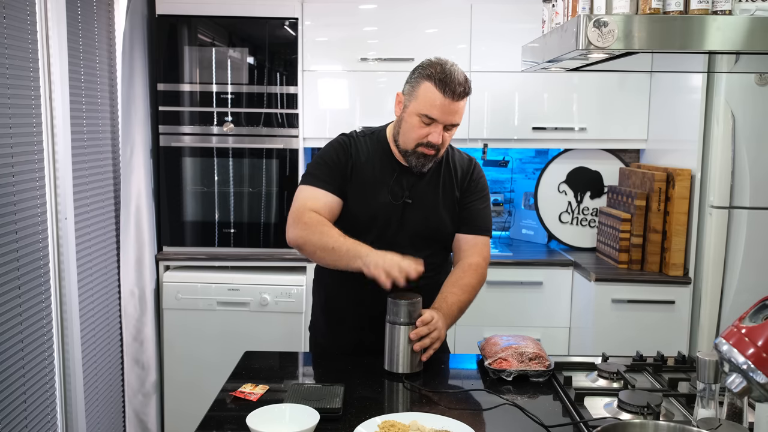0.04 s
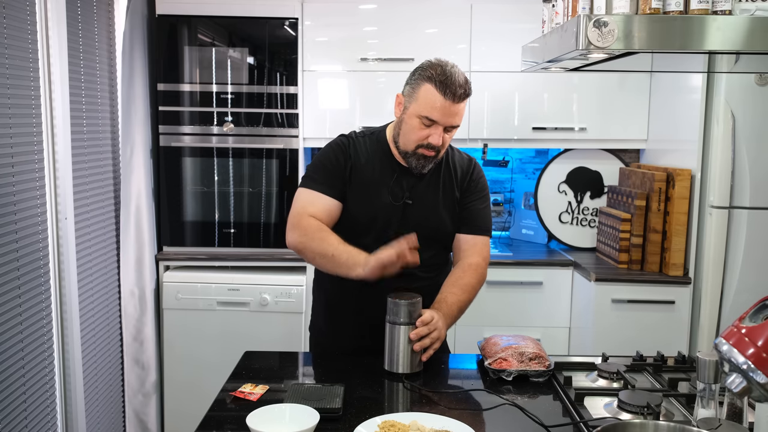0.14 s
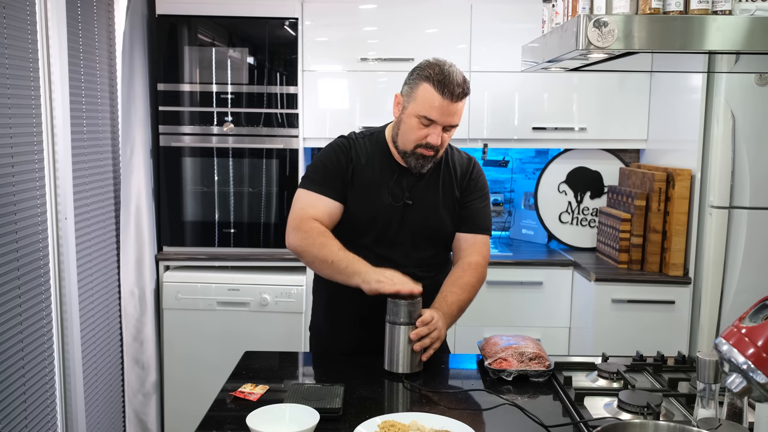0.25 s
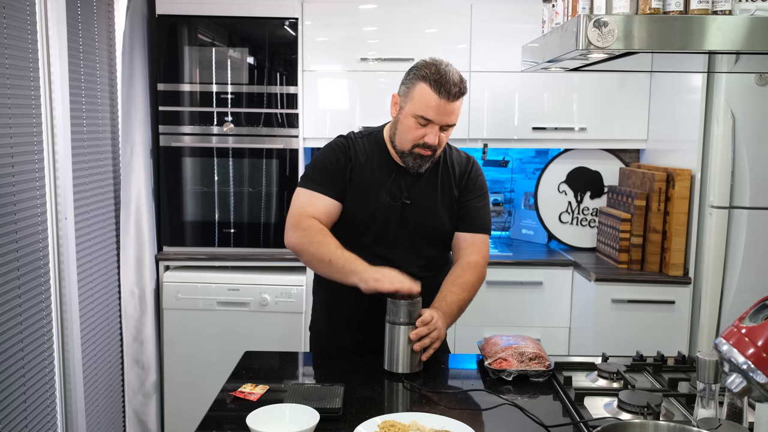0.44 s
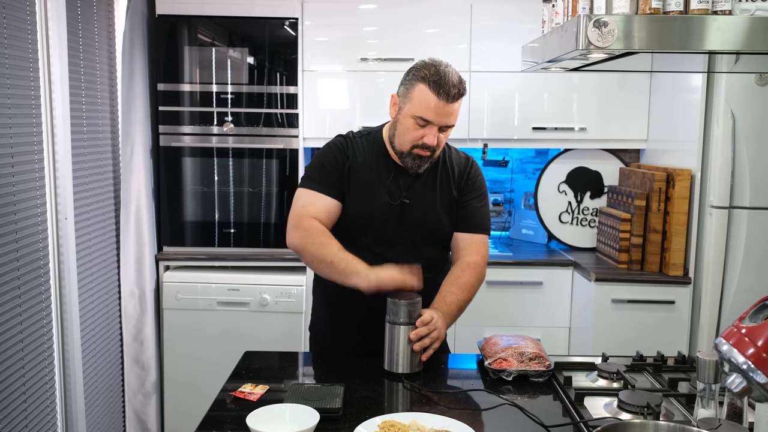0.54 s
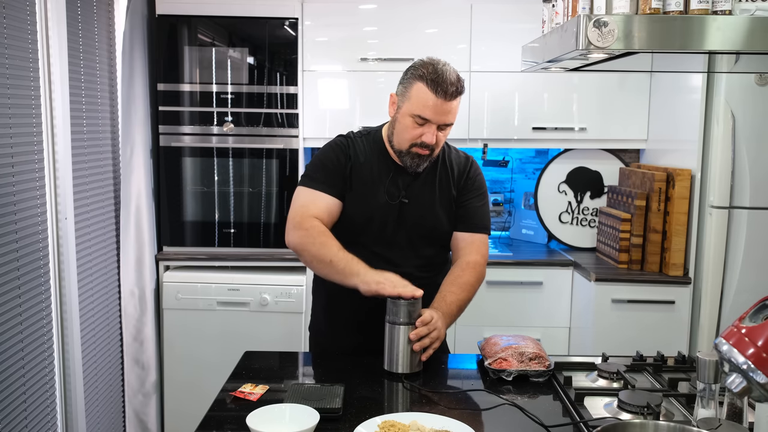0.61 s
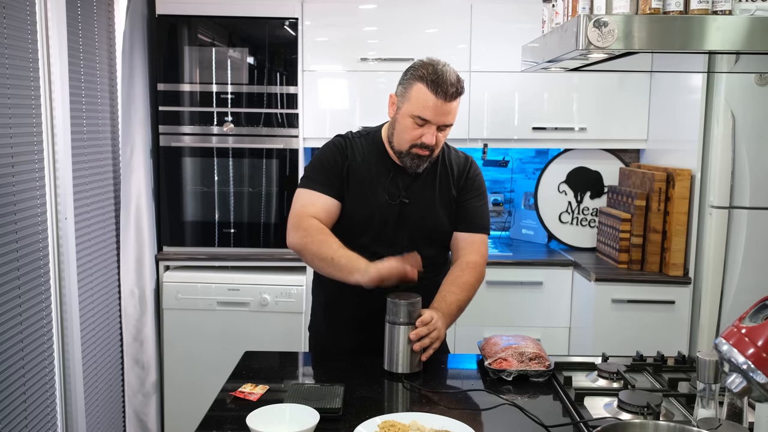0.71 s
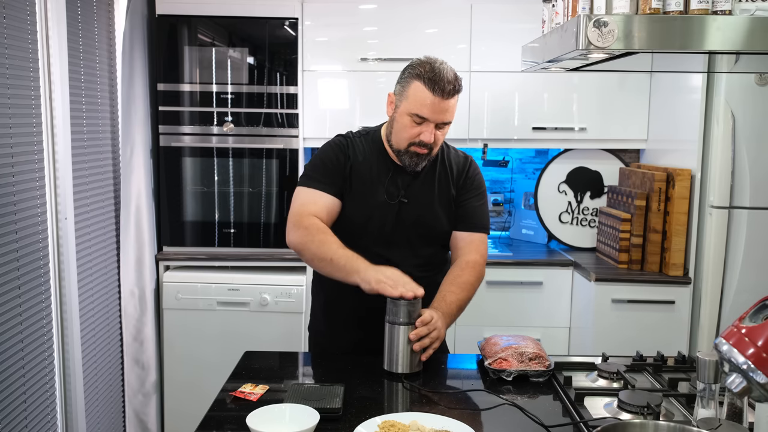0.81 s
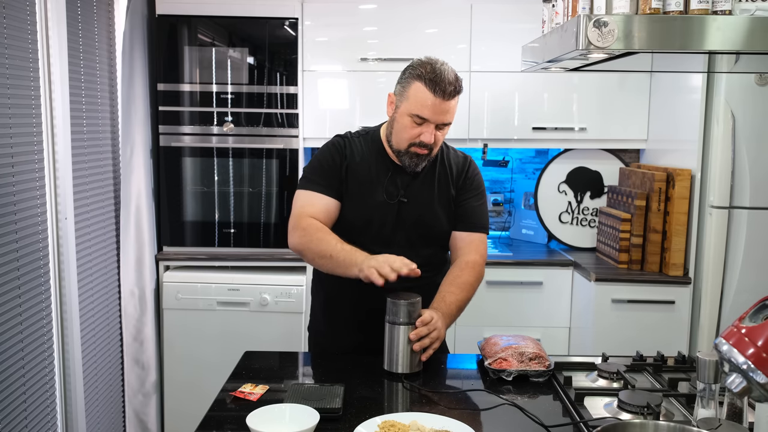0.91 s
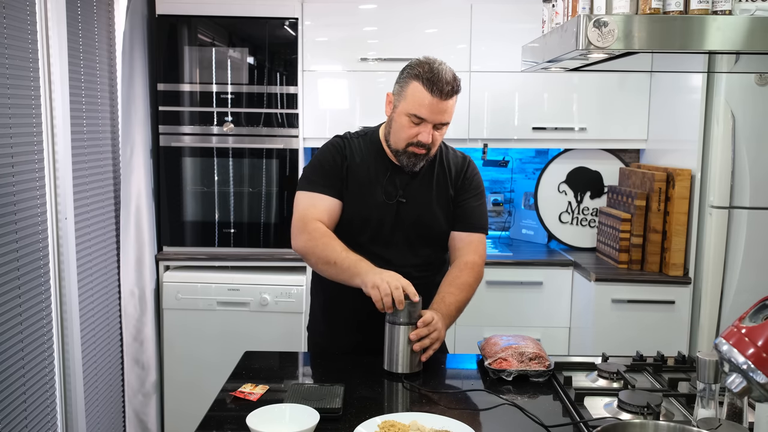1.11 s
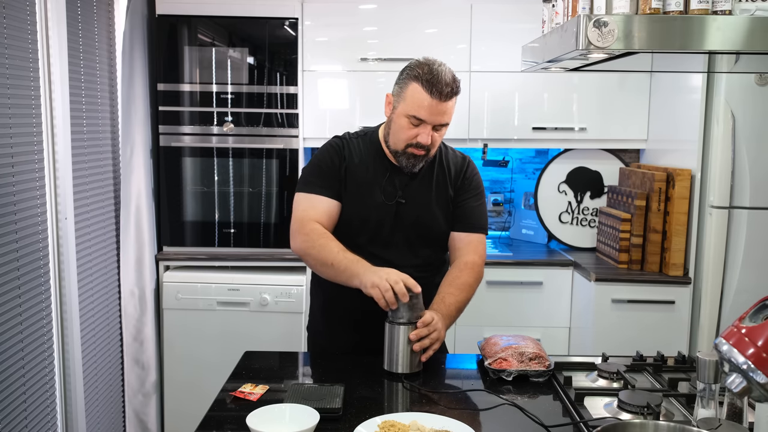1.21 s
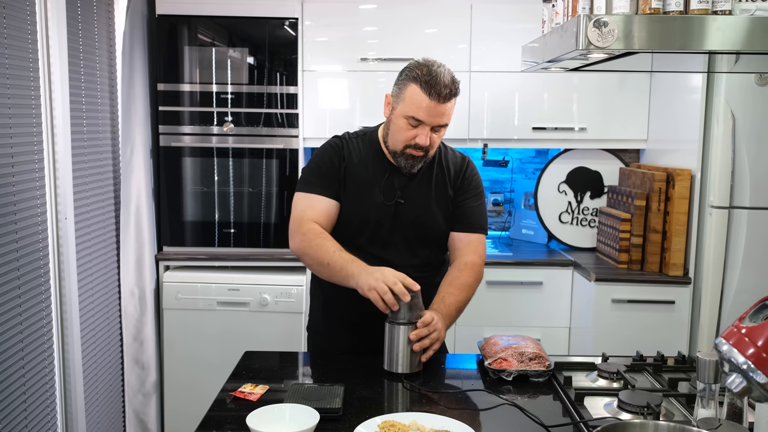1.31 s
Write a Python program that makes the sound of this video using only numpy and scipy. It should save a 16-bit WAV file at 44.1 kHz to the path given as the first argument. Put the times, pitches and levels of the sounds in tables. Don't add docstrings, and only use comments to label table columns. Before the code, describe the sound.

A hand smacks a grinder's plastic lid four times, then twists it with knocks and scrapes

```python
import sys
import numpy as np
from scipy import signal
from scipy.fft import rfft, irfft
from scipy.io import wavfile
from scipy.ndimage import uniform_filter1d

SR = 44100
rng = np.random.default_rng(int(sys.argv[2]) if len(sys.argv) > 2 else 0)


def volts(x):
    e = np.asarray(x, float) / 20
    return 10 ** e


def master(y):
    cut = np.clip(np.atleast_2d(y).T, -1, 1)
    pcm = np.round(cut * 32767)
    wavfile.write(sys.argv[1], SR, pcm.astype(np.int16))


N = 59535


def ring(force, hz, t60):
    pole = np.exp(2j * np.pi * hz / SR - np.log(1000) / (t60 * SR))
    return signal.lfilter([1], [1, -pole], force).imag


def band(x, hz, width):
    b, a = signal.iirpeak(min(hz, .45 * SR), hz / width, SR)
    return signal.lfilter(b, a, x)


def push(start_s, length_s):
    phase = (np.arange(N) / SR - start_s) / length_s
    return np.sin(np.pi * np.clip(phase, 0, 1)) * np.pi / (2 * length_s * SR)


def fade(start_s, t60):
    t = np.arange(N) / SR - start_s
    return (t >= 0) * volts(-60 * np.maximum(t, 0) / t60)


# (frequency [Hz], level per hertz [dB])
AIR_SPECTRUM = [(25, 7), (58, -2), (140, -5), (500, -7.5), (950, -8), (1500, -21), (11500, -34.5),
                (14500, -48.5)]


def air():
    level_db, waver_db, waver_samples = -64.5, 0.85, 1500
    hz, db = np.array(AIR_SPECTRUM).T
    f = np.maximum(np.arange(N // 2 + 1) * SR / N, 1)
    shape = volts(np.interp(np.log(f), np.log(hz), db))
    hiss = irfft(rfft(rng.standard_normal(N)) * shape, N)
    steps = np.repeat(rng.standard_normal(N // waver_samples + 1), waver_samples)[:N]
    waver = uniform_filter1d(steps, size=waver_samples)
    return hiss / hiss.std() * volts(level_db + waver_db * waver)


def patter(pop_s, low_hz, high_hz):
    lead_s, t60, grows_db, scatter_db = .0024, 0.0034, 2, 2.5
    taps = np.zeros(N)
    for finger, (strength, timing) in enumerate(rng.standard_normal((4, 2))):
        tap_s = pop_s - lead_s * (1 - (finger + 0.264 * timing) / 3.5)
        taps += volts(scatter_db * strength + grows_db * (finger - 4)) * push(tap_s, .00008)
    low = ring(taps, low_hz, 2.37 * t60)
    middle = volts(-2.5) * ring(taps, (low_hz * high_hz) ** .5, t60)
    high = volts(-1) * ring(taps, high_hz, 1.74 * t60)
    hiss = rng.standard_normal(N) * fade(pop_s - .0007, 0.0079)
    return low + middle + high + volts(-1) * band(hiss, 8900, 4200)


# (frequency [Hz], level [dB], T60 [s])
BODY_MODES = [(425, -1.5, 0.051), (543, -6.5, 0.033), (680, -22.5, .04), (773, -3, 0.016), (868, -32, 0.54),
              (879, -26, 0.33), (1072.6, -13.5, 0.11), (4200, -35, 0.067)]


def body(force):
    scatter_db, detune = 2, 0.022
    out = np.zeros(N)
    for hz, db, t60 in BODY_MODES:
        strength, pitch = rng.standard_normal(2)
        out += volts(db + scatter_db * strength) * ring(force, hz * (1 + detune * pitch), t60)
    return out


# (palm pop time [s], palm level [dB], patter level [dB], low patter [Hz], high patter [Hz])
SLAP_EVENTS = [
    (0.2362, -11.5, -16.5, 1850, 3590),
    (0.4242, -11.5, -12, 1730, 3990),
    (0.6067, -10.5, -16, 2790, 3690),
    (0.7849, -11.5, -15.5, 1900, 3910),
]
# (pop frequency [Hz], lag of the early reflection off the counter [s], reflection
# level [dB])
PALM_CONTACTS = [
    (520, .0066, -23),
    (500, .0062, -23),
    (500, .0070, -15),
    (600, .0062, -18),
]


def slaps():
    out = np.zeros(N)
    for slap, (pop_hz, reflect_lag_s, reflect_db) in zip(SLAP_EVENTS, PALM_CONTACTS):
        pop_s, palm_db, patter_db, low_hz, high_hz = slap
        palm = push(pop_s - .0009, .0007)
        pop = volts(-2) * ring(palm, pop_hz, .013)
        out += volts(palm_db) * (pop + body(palm))
        out -= volts(patter_db) * patter(pop_s, low_hz, high_hz)
        out += volts(reflect_db) * ring(push(pop_s + reflect_lag_s, 0.00035), 685, 0.021)
    return signal.sosfilt(signal.butter(2, 200, "high", fs=SR, output="sos"), out)


ROOM_GAP_S = 0.0013

# (frequency [Hz], level [dB], T60 [s])
ROOM_ECHO = [(55, -42, 0.41), (400, -22.5, 0.44), (584, -24, 0.41), (850, -23, 0.41), (1580, -29, 0.39),
             (4300, -32, 0.33), (5520, -36.5, 0.48), (11050, -38.5, 0.28)]
# (frequency [Hz], level [dB], T60 [s], side of the node at the microphone [+1 or -1])
STANDING_WAVES = [(92, -24, .16, 1), (120, -22, .11, -1), (167, -23, .23, 1), (185, -25, .25, 1),
                  (207, -29, .26, -1), (243, -35, .55, -1), (283, -30, .4, 1), (304, -21, .22, 1),
                  (313, -24, .22, -1), (340, -29, .2, 1), (399, -30, .42, -1), (422, -26, .45, 1),
                  (447, -42, .6, 1), (465, -28, .3, -1)]


def standing_waves(t):
    lag_s, rise_s = .001, .006
    waves = np.zeros(len(t))
    for hz, db, t60, side in STANDING_WAVES:
        waves += side * volts(db - 60 * t / t60) * np.sin(2 * np.pi * hz * (t - lag_s))
    return volts(-1) * waves * (1 - np.exp(-(t / rise_s) ** 2))


def kitchen():
    rise_cycles, same_below_hz = 0.99, 840
    size = SR // 2
    t = np.arange(size) / SR
    late = np.maximum(t - ROOM_GAP_S, 0)
    table_hz, table_db, table_t60 = np.array(ROOM_ECHO).T
    echoes = np.tile(standing_waves(t), (len(SLAP_EVENTS), 1))
    for hz in 50 * 2 ** np.arange(0, 8.4, 1 / 3):
        db = np.interp(np.log(hz), np.log(table_hz), table_db) - 5
        t60 = np.interp(np.log(hz), np.log(table_hz), table_t60)
        same = 1 / (1 + (hz / same_below_hz) ** 2)
        common, own = rng.standard_normal(size), rng.standard_normal(echoes.shape)
        noise = same ** .5 * common + (1 - same) ** .5 * own
        noise = band(band(noise, hz, hz / 3), hz, hz / 3)
        swell = (1 - np.exp(-late * hz / rise_cycles)) ** 2 * volts(db - 60 * late / t60)
        echoes += noise / noise.std() * swell
    out = np.zeros(N + size)
    for (pop_s, palm_db, *_), echo in zip(SLAP_EVENTS, echoes):
        start = int(pop_s * SR)
        out[start:start + size] += volts(palm_db) * echo
    return out[:N]


# (time [s], level [dB], frequency [Hz], T60 [s])
LID_KNOCKS = [(1.065, -61.5, 6200, .01), (1.098, -58, 2340, 0.013), (1.159, -51.5, 455, 0.1),
              (1.175, -49, 196, 0.037), (1.186, -34, 740, 0.0092), (1.192, -46, 1750, 0.06),
              (1.2125, -35.5, 400, 0.034), (1.244, -30, 400, 0.01), (1.251, -41.5, 730, 0.04),
              (1.257, -47, 345, 0.28), (1.2614, -49, 8800, .01), (1.271, -60, 2365, 0.18),
              (1.27, -38.5, 2340, 0.028), (1.285, -43, 650, 0.037), (1.338, -39, 2270, 0.0067),
              (1.339, -45, 378, 0.046)]


def knocks():
    out = np.zeros(N)
    for s, db, hz, t60 in LID_KNOCKS:
        knock = band(ring(push(s, .6 / hz), hz, t60), hz, hz)
        noise = rng.standard_normal(N) * fade(s, 0.036)
        tick = volts(-10) * min(hz / 2300, 1) * band(rng.standard_normal(N), 5900, 7000) * fade(s, 0.036)
        out += volts(db) * (knock + tick)
    return out


# (time [s], dull rub level [dB], bright scrape level [dB])
LID_MOTION = [(1.156, -82, -93), (1.162, -65, -85), (1.19, -41, -62), (1.207, -51.5, -64),
              (1.223, -44, -55.5), (1.242, -75, -52.5), (1.252, -44.5, -68), (1.268, -59, -52),
              (1.304, -57.5, -66), (1.325, -61.5, -90)]
# (frequency [Hz], width [Hz], level [dB])
PLASTIC_MODES = [(207, 130, -1), (330, 48, 3), (772, 240, -4.5), (1275, 120, -1), (1930, 350, -5),
                 (2390, 200, -7.5)]
# (frequency [Hz], width [Hz], level [dB])
RIM_MODES = [(2370, 40, 0), (3500, 300, -4), (4300, 400, 0), (5800, 300, -6), (6700, 300, -6),
             (8000, 400, -11), (10500, 3000, -14)]


def scrape():
    slips_per_s, scatter_db = 6000, 2.5
    out, t = np.zeros(N), np.arange(N) / SR
    move_s, rub_db, scrape_db = np.array(LID_MOTION).T
    for level_db, modes in ((rub_db, PLASTIC_MODES), (scrape_db, RIM_MODES)):
        chance, sign, strength = rng.random((3, N))
        slips = (chance < slips_per_s / SR) * np.sign(sign - .5)
        slips = slips * volts(-scatter_db * np.log(1 - strength))
        slips = slips / slips.std() * volts(np.interp(t, move_s, level_db, left=-120))
        for hz, width, db in modes:
            out += volts(db + 10.5) * band(band(slips, hz, width), hz, 2 * width)
    return out


def lid():
    direct = knocks() + scrape()
    echo = rng.standard_normal(N) * fade(ROOM_GAP_S, 0.61) * volts(-41)
    return direct + signal.fftconvolve(direct, echo)[:N]


def scene():
    return (air() + slaps() + kitchen() + lid())[None]


def roll_off(x):
    return signal.sosfilt(signal.butter(12, 16800, fs=SR, output="sos"), x)


def record(dry):
    headroom = .6
    mic = signal.butter(3, [40, 13200], "band", fs=SR, output="sos")
    heard = signal.sosfilt(mic, dry)
    return roll_off(headroom * np.tanh(heard / headroom))


dry = scene()
out = record(dry)
master(out)
```